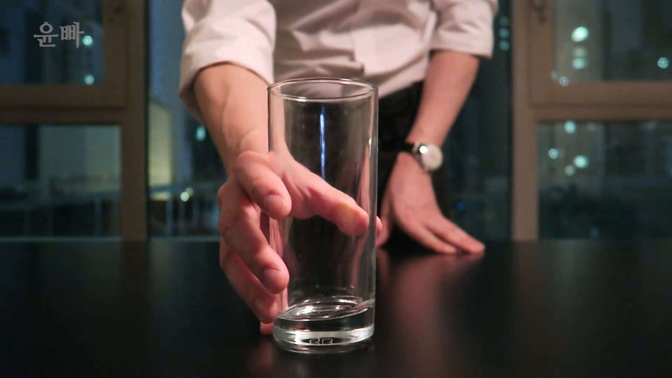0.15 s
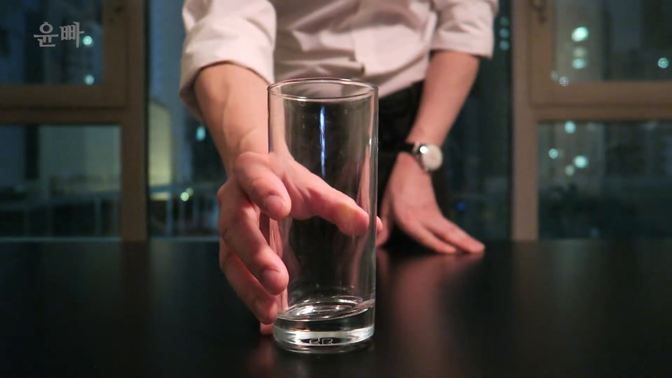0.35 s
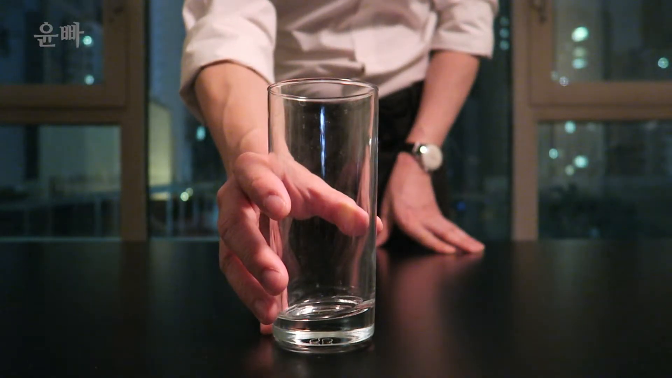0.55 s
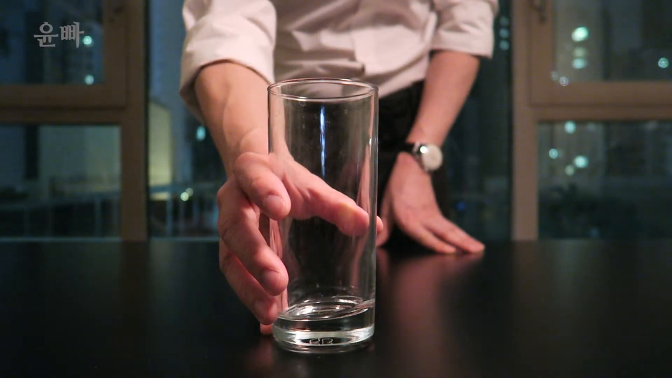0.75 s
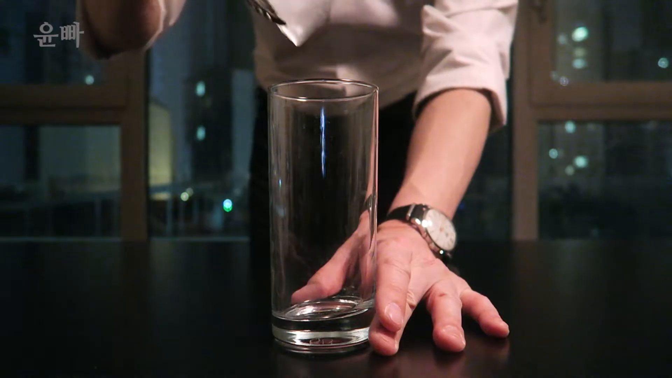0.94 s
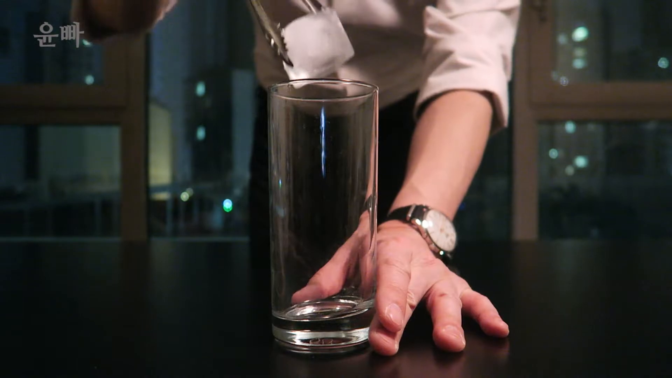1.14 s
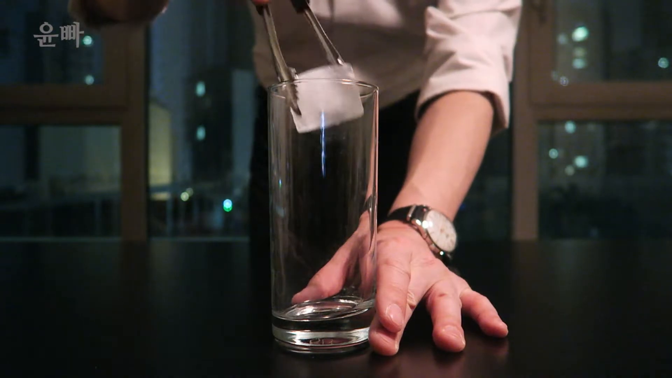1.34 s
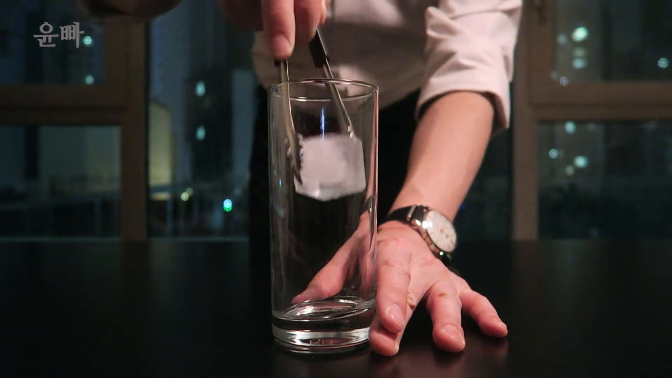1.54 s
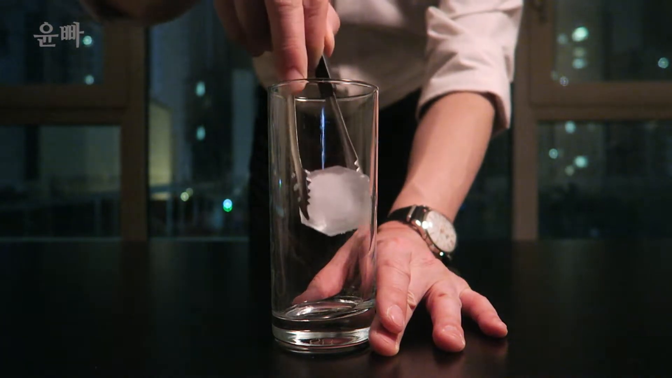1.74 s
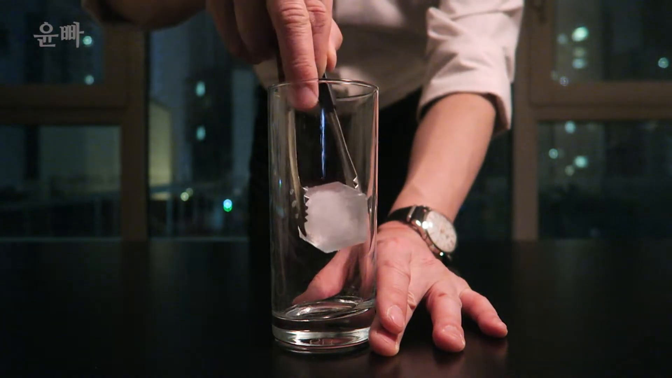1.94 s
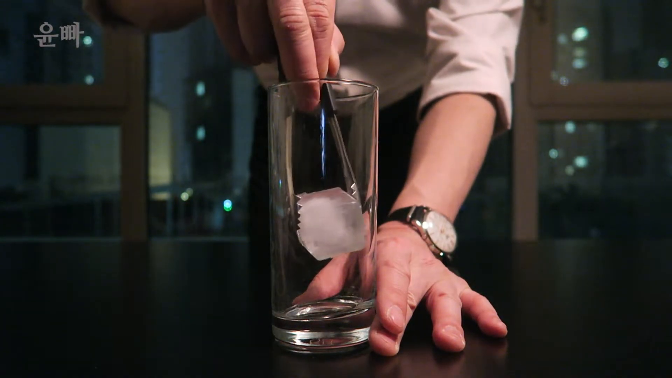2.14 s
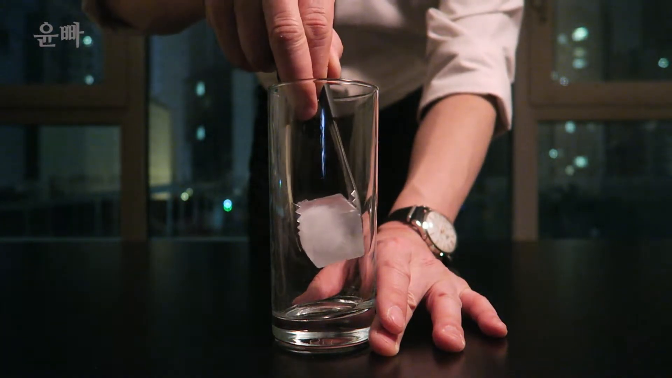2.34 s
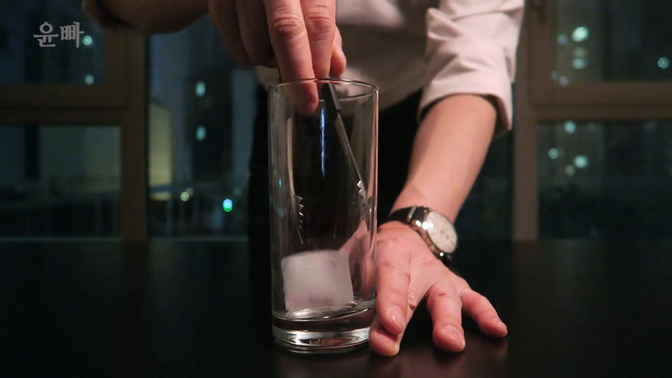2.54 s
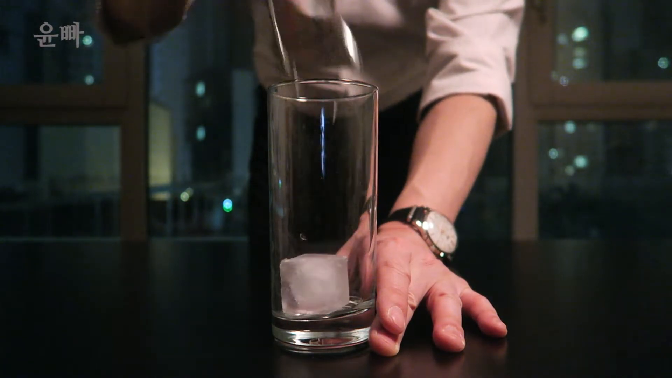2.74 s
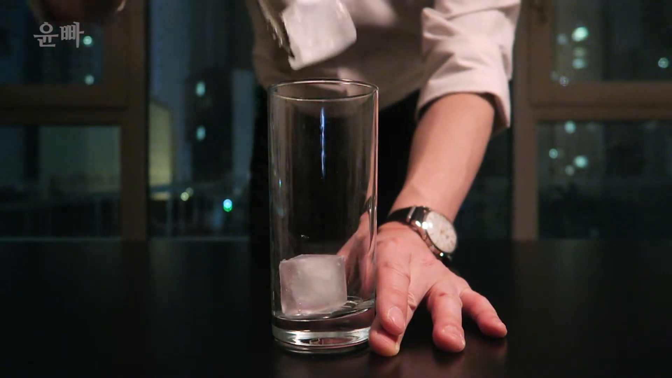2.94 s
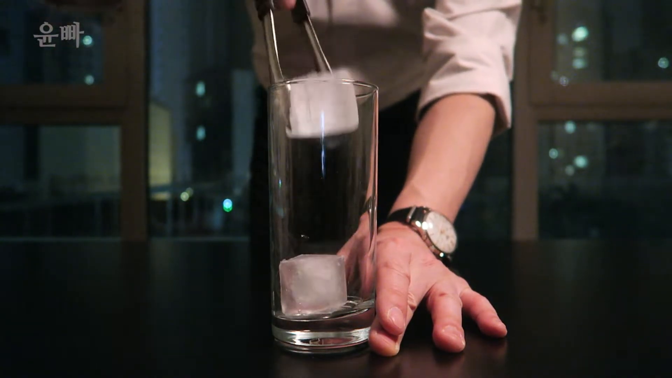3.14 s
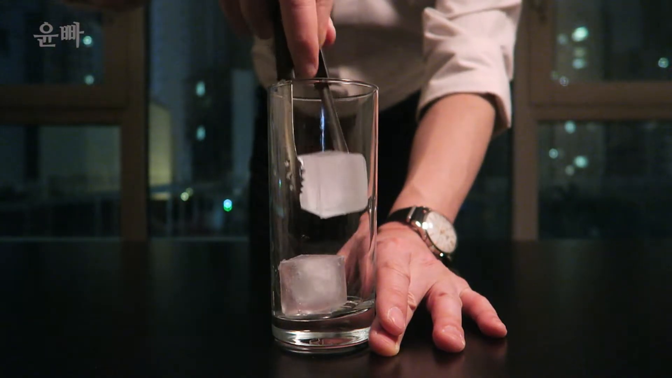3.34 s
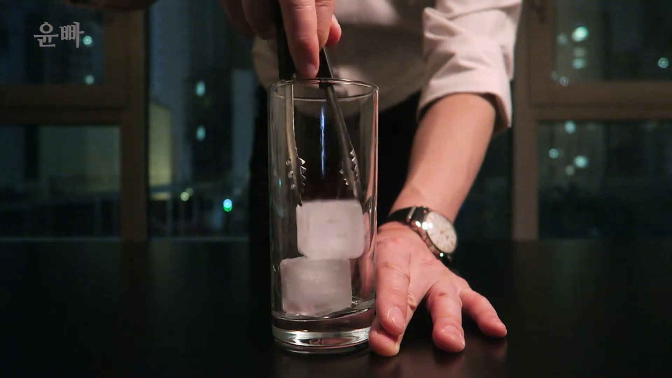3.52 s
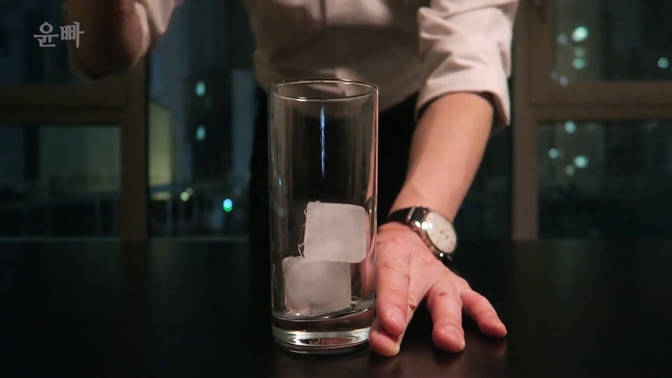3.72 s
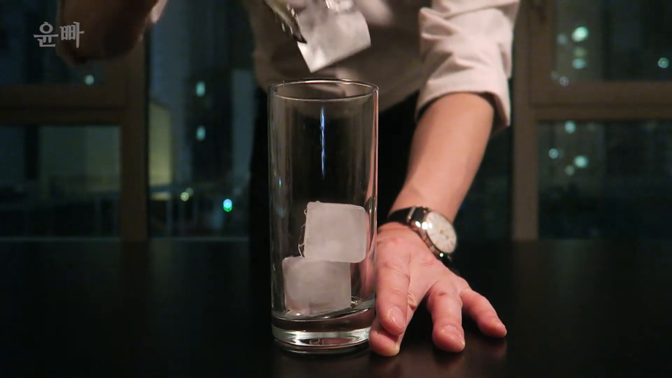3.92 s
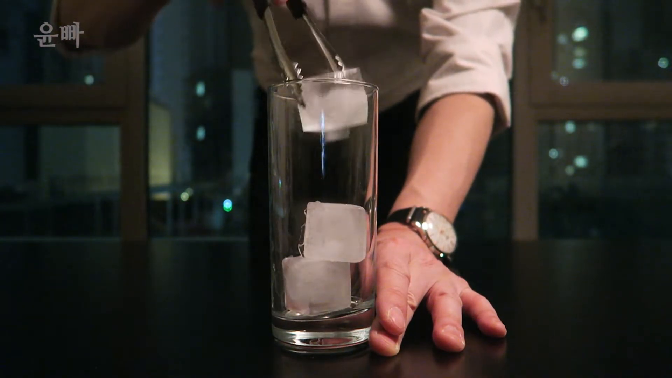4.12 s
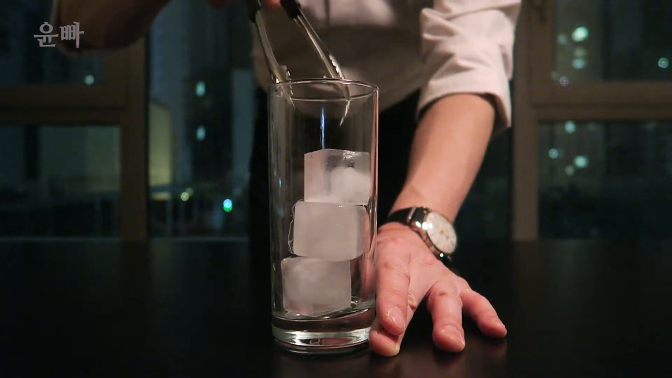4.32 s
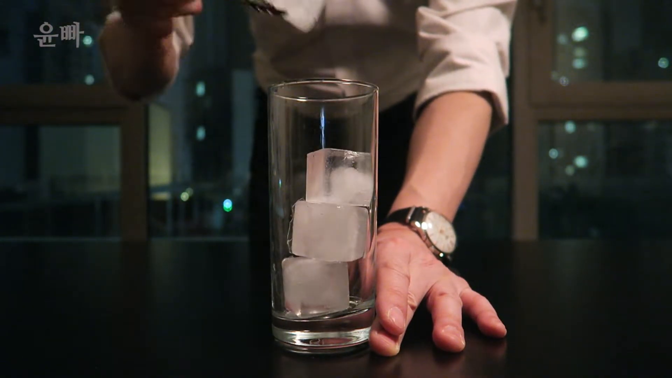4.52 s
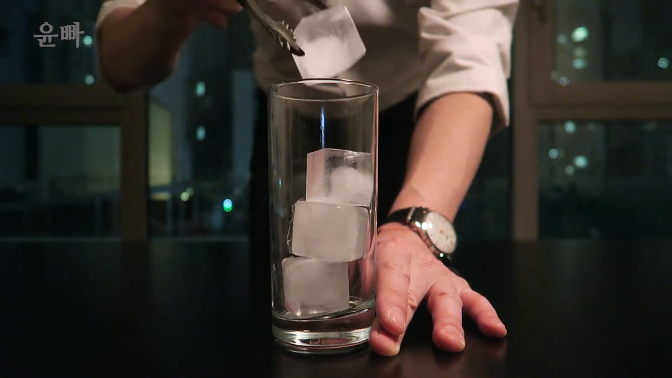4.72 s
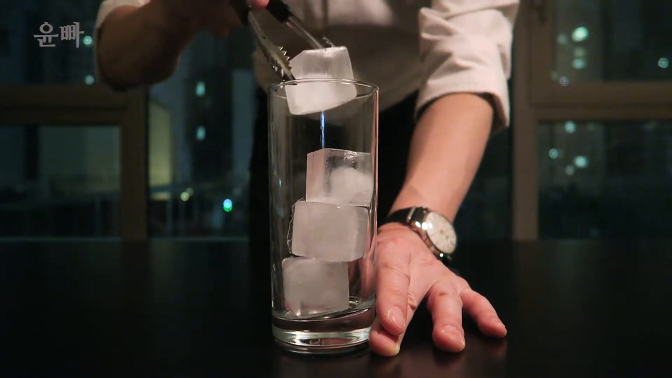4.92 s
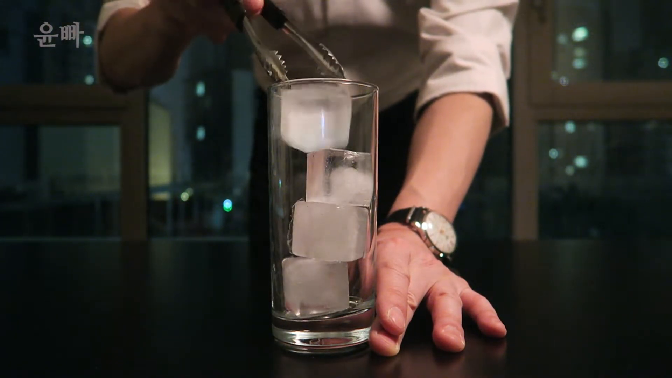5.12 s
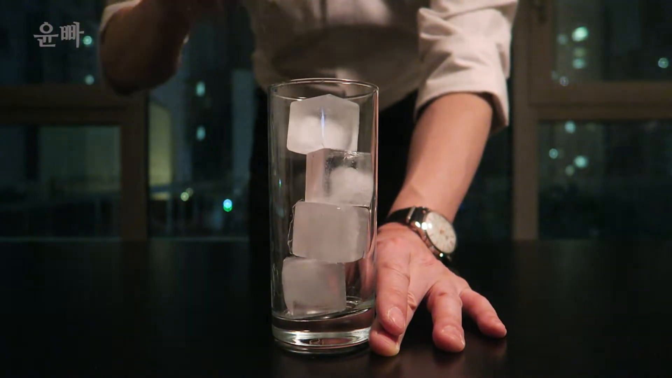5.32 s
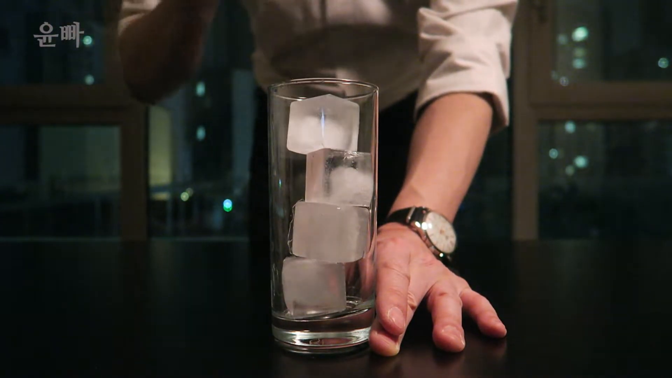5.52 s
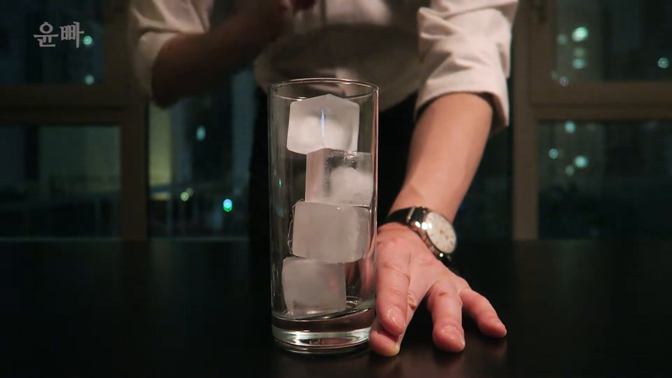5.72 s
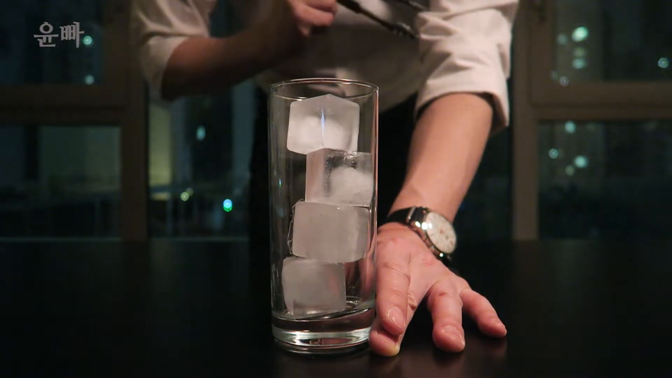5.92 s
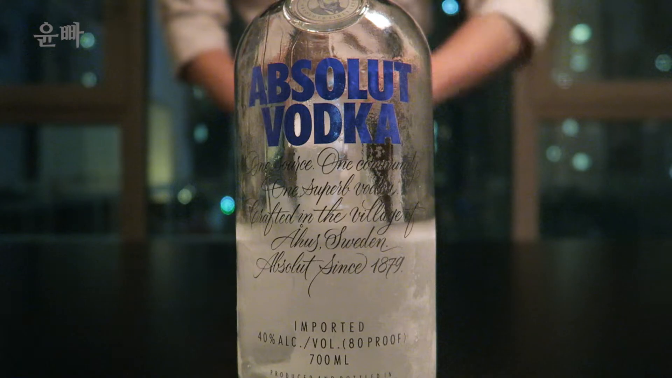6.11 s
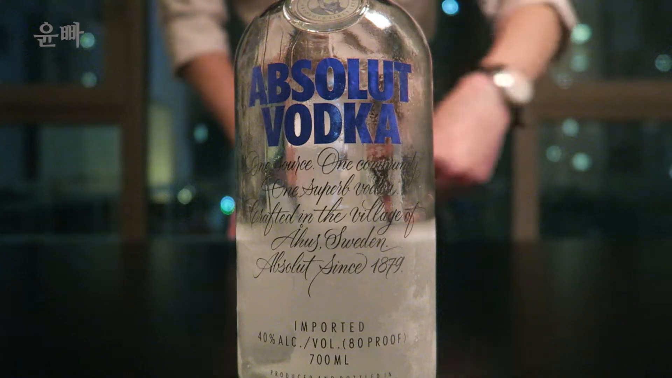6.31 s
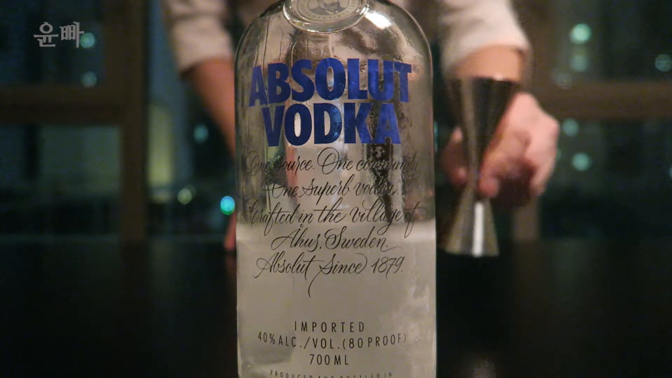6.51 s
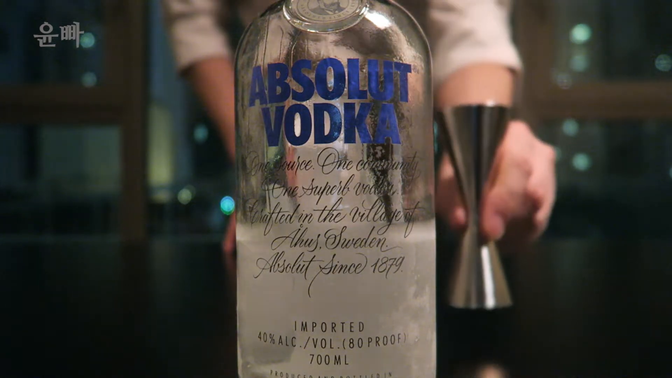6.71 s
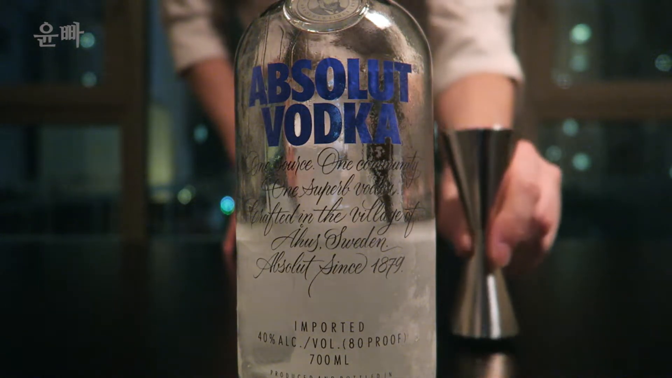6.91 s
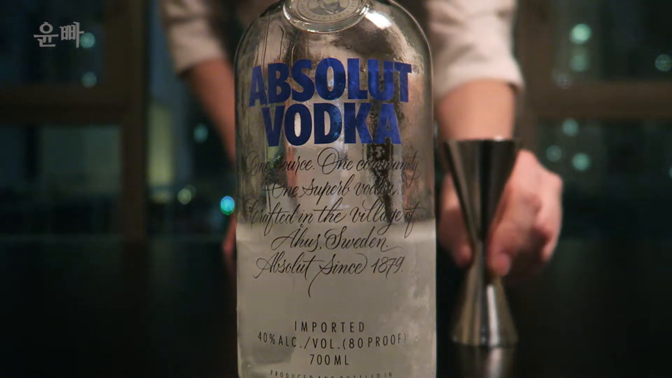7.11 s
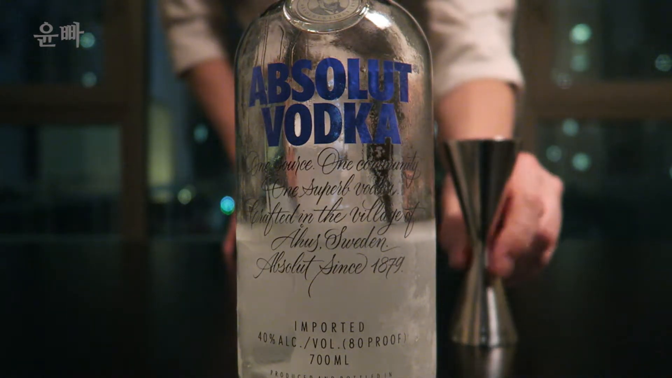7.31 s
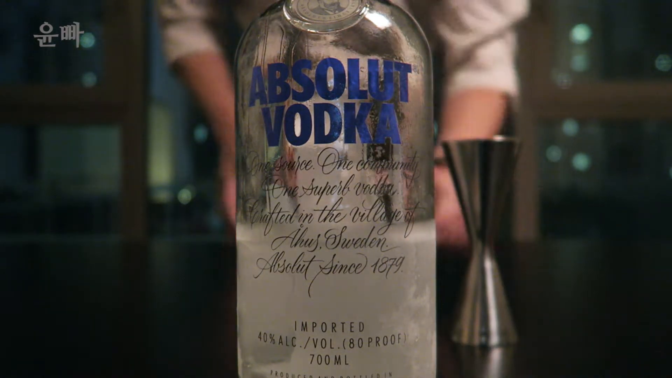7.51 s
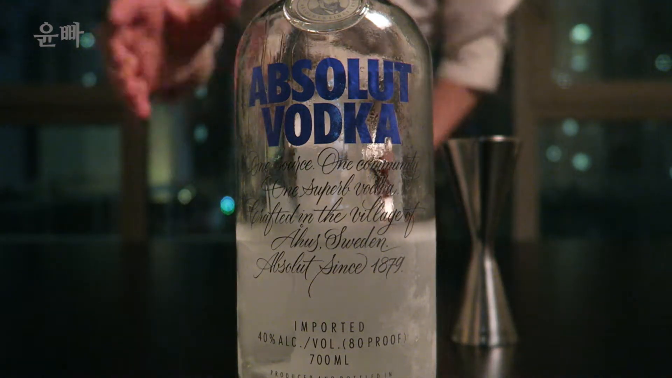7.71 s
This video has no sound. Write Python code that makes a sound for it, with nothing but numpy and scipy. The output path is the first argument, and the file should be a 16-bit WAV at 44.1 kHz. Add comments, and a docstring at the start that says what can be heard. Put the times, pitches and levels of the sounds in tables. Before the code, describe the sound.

Low machine hum and dull room air throughout, with faint cloth brushing. Ice is placed with tongs into a tall glass: first a small touch and rattling landing, then three more separated clinks, the second and third hard and crisp, the last softer and doubled. Rings are mostly damped quickly by the ice. Finally a metal jigger strikes the tabletop, short and solid, with a little room reverberation. Close miked.

```python
"""Room air, steady hums and sleeve swells (shaped noise and sines) run throughout; a faint gliding tone comes early.
Four ice cubes are then let down with tongs into a tall glass: each touch of the wall excites its decaying modes,
the tongs ping, and each landing rings the base and the air inside, cracks and shakes the table.
Last, a steel jigger is set on the table and rocks: its own modes and the air in its cup ring.
The sound runs in successive stretches, and the end of each one stops whatever still rings."""
import sys
import numpy as np
from scipy import signal
from scipy.fft import rfft, irfft
from scipy.io import wavfile

SR = 44100
rng = np.random.default_rng(int(sys.argv[2]) if len(sys.argv) > 2 else 0)


def int16_out(signal):
    """Quantize to a 16-bit WAV file."""
    q = np.round(np.clip(np.atleast_2d(signal).T, -1, 1) * 32767)
    wavfile.write(sys.argv[1], SR, q.astype(np.int16))


N = 342075

# Boundaries of the stretches. Each entry: time in seconds.
BOUNDARIES = [0, .82, 2.837, 3.771, 4.489, 6.05, N / SR]


def amp(db):
    """Level to amplitude: 20 dB is a factor of ten."""
    return 10 ** (np.asarray(db) / 20)


def unit(x):
    """Normalization of power: scales a signal to rms 1."""
    return x / np.sqrt(np.mean(x ** 2) + 1e-20)


def read(points, hz):
    """Linear interpolation of a table on a logarithmic frequency axis."""
    point_hz, value = np.transpose(points)
    return np.interp(np.log(hz + 1), np.log(point_hz + 1), value)


def colour(x, points):
    """Spectral shaping: weights each frequency by a table of Hz and dB."""
    gain = amp(read(points, np.fft.rfftfreq(len(x), 1 / SR)))
    return irfft(rfft(x) * gain, len(x))


def add(mix, s, sound):
    """Superposition: adds a sound to the mix from s seconds on."""
    part = mix[round(s * SR):][:len(sound)]
    part += sound[:len(part)]


def spread(mid, side):
    """Diffuse-field coherence: two close microphones hear the bass alike, the treble less so."""
    # Each row: frequency in Hz, level of side against mid in dB.
    width = [(60, -28), (160, -7.5), (350, 0.5), (700, -5), (1500, 0.5), (3000, -1.5), (6000, 0),
             (14000, 0.5)]
    side = colour(side, width)
    return np.array([mid + side, mid - side])


def noise(points):
    """Diffuse noise: independent mid and side of the given spectrum, each rms 1 before spreading."""
    mid, side = (unit(colour(white, points)) for white in rng.standard_normal((2, N)))
    return spread(mid, side)


def drone(t):
    """Frequency modulation: a faint tone fades in, holds and fades out while its pitch rises and sinks."""
    start_s, length_s, fade_s = 1.13, 1.277, 0.29
    level_db, base_hz, arch_hz = -46.5, 209, 14
    age = np.clip(t - start_s, 0, length_s)
    hz = base_hz + arch_hz * np.sin(np.pi * age / length_s)
    phase = 2 * np.pi * np.cumsum(hz) / SR
    fade = np.minimum(np.minimum(age, length_s - age) / fade_s, 1)
    return amp(level_db) * fade * np.sqrt(2) * np.sin(phase)


def sleeves(t):
    """Friction noise: each move of an arm is one bell-shaped swell of brushing cloth."""
    # Moves of an arm. Each row: loudest moment in seconds, time to swell or fade in seconds, level in dB rms.
    arm_moves = [(1.03, 0.22, -64.5), (1.52, 0.2, -64), (3.45, .08, -62.5), (4.21, 0.055, -64.5),
                 (5.14, 0.052, -65), (5.8, 0.17, -62.5), (6.5, 0.26, -61), (7.68, 0.21, -57)]
    # Spectrum of rubbed cloth. Each row: frequency in Hz, relative level in dB per Hz.
    cloth = [(200, -20.5), (900, -2.5), (3000, 2), (5500, -7.5), (10000, -19.5), (16000, -23.5)]
    rest_db = -74  # cloth stirs faintly between the moves
    moves = sum(amp(db) * np.exp(-((t - s) / swell_s) ** 2) for s, swell_s, db in arm_moves)
    return np.hypot(moves, amp(rest_db)) * noise(cloth)


def background():
    """Superposition of room air, brushing sleeves and the faint gliding tone."""
    # Spectrum of the room air. Each row: frequency in Hz, relative level in dB per Hz.
    air_spectrum = [(59, -45), (100, -11), (129, -7), (214, -4), (249, -5.5), (372, -10.5), (404, -5.5),
                    (813, -19), (1190, -19.5), (1270, -21), (14200, -45), (15800, -56.5)]
    air_db = -52
    t = np.arange(N) / SR
    return sleeves(t) + amp(air_db) * noise(air_spectrum) + drone(t)


def hum(start, end):
    """Steady sinusoids: the machinery tones whose span holds the middle of this stretch."""
    # Each row: start of the span in seconds, end in seconds, frequency in Hz, level in dB rms.
    machinery = [(0, 6.05, 69.5, -41), (0, .82, 120, -52), (6, 7.76, 78.6, -41), (2, 6.05, 280, -63),
                 (3.5, 7.76, 140, -61)]
    t = np.arange(round(start * SR), round(end * SR)) / SR
    phases = rng.uniform(0, 2 * np.pi, len(machinery))
    return sum(np.sqrt(2) * amp(db) * np.sin(2 * np.pi * hz * t + phase)
               for (on, off, hz, db), phase in zip(machinery, phases) if on < t.mean() < off)


def room_tail(build_s=0.0086):
    """Reverberation: dense reflections build up, then decay exponentially band by band."""
    # Each row: frequency in Hz, reverberation time t60 in seconds.
    decay_times = [(150, 0.4), (400, 0.1743), (1000, 0.4232), (2200, 0.3734), (4000, 0.3743), (7500, 0.33),
                   (14000, 0.2)]
    # Each row: frequency in Hz, level of the tail in dB.
    tail_levels = [(100, -20.5), (200, -2), (500, 0), (1000, -10.5), (2100, -6.5), (4000, -6.5),
                   (8000, -3.5), (14000, -8)]
    # sparse impulses of random sign, on average one in ten samples
    impulses = rng.choice([-1., 1.], SR) * (rng.random(SR) < 1 / 10)
    hz, t, bands = signal.stft(impulses, SR, nperseg=256)
    t60 = read(decay_times, hz)[:, None]
    decay = amp(read(tail_levels, hz)[:, None] - 60 * t / t60)
    # the same energy whatever the decay time
    energy_scale = np.sqrt(10 * np.log(10 ** 6) / (t60 * SR))
    tail = signal.istft(bands * decay * energy_scale, SR, nperseg=256)[1][:SR]
    return tail * np.minimum(np.arange(SR) / SR / build_s, 1) ** 2


def room(x, wet_db, side_db=-5):
    """Convolution with a room response: direct sound, near surfaces, then the tail, at two microphones."""
    # Near surfaces. Each row: delay in seconds, level in dB, extra delay at the right microphone in seconds.
    echoes = [(.0022, -13, .00005), (.0047, -19.5, -.00005), (.0093, -18.5, .00007), (0.0133, -14, -.00007)]
    # Each row: frequency in Hz, phase by which the left microphone leads in radians.
    phase_lead = [(0, -0.026), (1200, -0.04), (2070, -0.28), (3960, 0.046), (5600, -0.1), (6980, 0.28),
                  (7320, 0.1), (11900, 0.1), (15500, 0.0)]
    left, right = spread(room_tail(), amp(side_db) * room_tail())
    for delay_s, db, lag_s in echoes:
        left[round(delay_s * SR)] += amp(db)
        right[round((delay_s + lag_s) * SR)] += amp(db)
    lead = read(phase_lead, np.fft.rfftfreq(len(x), 1 / SR))
    # half the lead goes to each side
    turn = np.exp(.5j * np.outer([1, -1], lead))
    direct = irfft(rfft(x) * turn, len(x))
    reflected = signal.fftconvolve(x[None], np.array([left, right]), axes=1)[:, :len(x)]
    return direct + amp(wet_db) * reflected


def knock(body, level_db, treble_hz, bass_hz, air_hz, crack_db, table_db,
          air_db=1, air_t60=.04, crack_t60=0.037, table_t60=0.15):
    """Impact excitation: a blow rings a body and the air in it, cracks, and shakes the table top."""
    # Burst of a contact. Each row: frequency in Hz, relative level in dB per Hz.
    crack_spectrum = [(150, -19.5), (500, -8), (1500, -7), (2500, 0.5), (3400, 0.5), (4500, -7.5),
                      (9000, -16.5), (16000, -27)]
    # Crowded modes of the table top. Each row: frequency in Hz, relative level in dB per Hz.
    table_spectrum = [(100, -27), (175, -3), (240, -12.5), (400, -4), (800, -0.5), (1050, -8),
                      (1600, -11.5), (3000, -19.5), (8000, -38)]
    t = np.arange(SR // 2) / SR
    air = amp(air_db - 60 * t / air_t60) * np.sin(2 * np.pi * air_hz * t)
    # neighbouring modes start in opposite directions
    modes = sum((-1) ** k * amp(db - 60 * t / t60) * np.sin(2 * np.pi * hz * t)
                for k, (hz, db, t60) in enumerate(body))
    crack = unit(colour(rng.standard_normal(len(t)), crack_spectrum))
    crack = crack * amp(crack_db - 60 * t / crack_t60)
    table = unit(colour(rng.standard_normal(len(t)), table_spectrum))
    table = table * amp(table_db - 60 * t / table_t60)
    # a soft contact rounds off the treble, a light one makes little bass
    rounded = signal.butter(2, min(treble_hz, SR / 3), fs=SR)
    blow = signal.lfilter(*rounded, air + modes + crack + table)
    return amp(level_db) * signal.lfilter(*signal.butter(1, bass_hz, "high", fs=SR), blow)


def jigger_knock(s, level_db, treble_hz, crack_db, table_db):
    """Modal ringing of a struck shell: the steel jigger strikes the table and the air in its cup resonates."""
    # The jigger standing on the table. Each row: frequency in Hz, level in dB, t60 in seconds.
    jigger_modes = [(211, -11.5, 0.087), (293, -27, 0.32), (552, -10.5, 0.075), (678, -7, 0.04),
                    (747, -8, 0.11), (980, -3, 0.067), (1274, -8, 0.032), (1780, -17, 0.027),
                    (2014, -40, 0.81), (2025, -8, 0.04), (2227, -17, .06), (2820, -33.5, .04),
                    (3092, -15, 0.1), (3460, -18, 0.054)]
    bass_corner_hz, cup_air_hz = 763, 1530
    return knock(jigger_modes, level_db, treble_hz, bass_corner_hz, cup_air_hz, crack_db, table_db,
                 air_db=2.0, air_t60=0.018)


def ping(s, level_db):
    """Lightly damped bar modes: the thin, high ring of the steel tongs."""
    # The arms of the tongs. Each row: frequency in Hz, level in dB, t60 in seconds.
    arm_modes = [(10770, -1.5, 0.11), (10845, -3, .12), (14590, -8, .1)]
    t = np.arange(SR // 4) / SR
    return sum(amp(level_db + db - 60 * t / t60) * np.sin(2 * np.pi * hz * t) for hz, db, t60 in arm_modes)


def clink(level_db, bright_db, depth, free_s):
    """Modal excitation of the wall: a touch on a node misses its mode, and leaning ice damps the ring."""
    # The glass wall. Each row: frequency in Hz, level in dB, t60 in seconds, half waves from rim to base.
    wall_modes = [(2078.6, 3.5, .75, 0), (3950, -4.5, 0.58, 0.77), (6730, -9.5, .12, 3.5),
                  (6910, -15, 0.2, 3), (7720, -11, 0.19, 2.4), (12000, -20, .14, 3.5),
                  (12650, -25, .14, 3.5), (13560, -20.5, .11, 3.5), (14590, -23.5, .1, 4),
                  (15200, -28, .1, 4)]
    bright_top_hz = 8000  # the tilt of brightness stops here
    node_db = -24.5  # what a mode still gets when touched on a node
    twin_db, twin_split_hz = -23, 4.1  # the lowest mode's twin has a node under the ice and rings on
    lowest_leaning_t60, upper_leaning_t60 = 0.0071, 0.65  # extra damping under leaning ice (s)
    contact_s = 0.0002  # length of a touch
    tick_db, tick_t60, tick_hz = -7.5, 0.032, 1500  # level before the filter, decay (s), treble corner
    t = np.arange(SR) / SR
    hz, db, t60, half_waves = np.transpose(wall_modes)[:, :, None]
    swing = np.hypot(np.cos(np.pi * half_waves * np.clip(depth, 0, 1)), amp(node_db))
    tilt_db = bright_db * np.log2(np.minimum(hz, bright_top_hz) / hz[0])
    rings = swing * amp(level_db + db + tilt_db - 60 * t / t60)
    modes = rings * np.sin(2 * np.pi * hz * t)
    # the lowest mode swings widest, so leaning ice stops it within milliseconds
    leaning_s = np.maximum(t - free_s, 0)
    lowest = modes[0] * amp(-60 * leaning_s / lowest_leaning_t60)
    twin = rings[0] * amp(twin_db) * np.sin(2 * np.pi * (hz[0] + twin_split_hz) * t)
    upper = modes[1:].sum(0) * amp(-60 * leaning_s / upper_leaning_t60)
    tick = rng.standard_normal(len(t)) * amp(level_db + tick_db - 60 * t / tick_t60)
    tick = signal.lfilter(*signal.butter(1, tick_hz, fs=SR), tick)
    onset = 1 - np.exp(-(t / contact_s) ** 2)
    return (lowest + twin + upper) * onset + tick


def cube_knock(s, level_db, treble_hz, crack_db, table_db):
    """Impact on a plate: the harder the contact and the less it shakes the table, the less bass."""
    # The glass base and the ice on it. Each row: frequency in Hz, level in dB, t60 in seconds.
    base_modes = [(175, -10, 0.076), (272, -18.5, 0.12), (353, -18, 0.18), (420, -10, 0.068),
                  (530, -16.5, 0.068), (691.7, -15, 0.046), (810, -28, 0.55), (995, -15, .04),
                  (1216, -7.5, .025), (1690, -7.5, 0.026), (1985, -8, 0.032), (2450, -18.5, 0.035),
                  (2960, -14, .03), (3345, -8.5, 0.038), (3561, -10.5, .03), (4960, -17.5, 0.02)]
    # The air in the glass rises in pitch as the ice piles up, then sinks as the last cube narrows the mouth.
    # Each row: time in seconds, resonance in Hz.
    air_column = [(3.2, 730), (3.5, 833), (4.3, 827), (5.2, 758)]
    # bass corner of a soft knock that shakes the table at 0 dB, and the drop in dB that raises it an octave
    bass_corner_hz, bass_octave_db = 45, 13
    # treble corner of a soft knock, and the octaves the bass corner rises for each octave above it
    soft_hz, bass_follows = 2040, 1
    hardness = (treble_hz / soft_hz) ** bass_follows
    lightness = 2 ** (-(level_db + table_db) / bass_octave_db)
    bass_hz = min(bass_corner_hz * hardness * lightness, SR / 4)
    air_hz = np.interp(s, *np.transpose(air_column))
    return knock(base_modes, level_db, treble_hz, bass_hz, air_hz, crack_db, table_db)


def play(rows, voice, start, end):
    """Superposition in time: sounds the rows of a table that fall within one stretch."""
    dry = np.zeros(round(end * SR) - round(start * SR))
    for s, *columns in rows:
        if start <= s < end:
            add(dry, s - start, voice(s, *columns))
    return dry


def stretch(start, end):
    """Direct and reverberant sound: all blows of one stretch, in the room, over the hum."""
    # The jigger meets the table and rocks. Each row: start in seconds, level in dB, treble corner in Hz,
    # level of the crack in dB, level of the table top in dB.
    set_down = [(7.0253, 2, 2205, -7, -12.5), (7.368, -43.5, 1193, -11, 1)]
    # The tongs knock the glass or spring free. Each row: start in seconds, level in dB.
    pings = [(3.1686, -31.5), (3.5078, -45.5), (4.3652, -38.5), (5.2835, -51)]
    # Ice or tongs touch the wall. Each row: start in seconds, level in dB, brightness in dB per octave,
    # depth from 0 at the rim to 1 at the base, time until ice leans on the wall in seconds.
    clinks = [(1.7387, -16.5, -4.5, 0.67, 0.0068), (2.4882, -21.5, -2.5, 0.65, 0.1),
              (2.5412, -15, -0.5, 0.65, 0.037), (2.5668, -19, -3.5, 0.74, 0.076),
              (2.6418, -20, -8, 0.62, .3), (3.1686, -24, 5.5, 0.63, .072), (3.225, -38, 1, 0.33, .02),
              (3.5078, -9, -1, 0.65, .145), (3.653, -14, -7, 0.48, .3), (4.2595, -16.5, 1, 0.098, 0.22),
              (4.3652, -23, -1.5, 0.65, 0.063), (5.16, -23, -5, 0.36, 0.013), (5.1848, -23, 0, 0.16, 0.021),
              (5.2266, -16, -2.8, 0.097, 0.038), (5.2835, -40, 1.5, .88, .076),
              (5.362, -33, -3, 0.71, 0.024)]
    # Cubes land, bounce and settle. Each row: start in seconds, level in dB, treble corner in Hz,
    # level of the crack in dB, level of the table top in dB.
    landings = [(1.7472, -24, 1627, -5, -7), (2.5666, -2.5, 2250, -13, -3.5), (2.5792, -13, 4500, 1, -4.5),
                (2.6413, -7.5, 3170, -8.5, -4.5), (2.706, -26, 4000, -15, 0),
                (3.1688, -27.5, 1200, -10.5, -8.5), (3.1861, -14.5, 1000, -0.5, -12.5),
                (3.498, 1, 6000, -7, -23.5), (3.589, -17, 1500, -13, -7), (3.624, -18, 1800, -25.5, -6),
                (3.6528, -39.5, 6900, 11.5, -10.5), (4.2535, -36.5, 7000, 0.5, -11),
                (4.2594, 4, 7986, -2, -10), (4.277, -23.5, 7100, 2.5, -12.5), (4.3235, -11, 3500, 0.5, -3),
                (5.1843, -5, 1900, -11, -6), (5.2075, -9.5, 2010, 0.5, -12.5),
                (5.2675, -26.5, 3200, 4, 2.5), (5.325, -24, 1200, 4, -10.5), (5.8125, -40, 4500, 2, -3.5)]
    jigger = play(set_down, jigger_knock, start, end)
    tongs = play(pings, ping, start, end)
    chimes = play(clinks, lambda s, *touch: clink(*touch), start, end) + tongs
    ice = play(landings, cube_knock, start, end)
    soft_edges = signal.windows.tukey(len(ice), .002 / (end - start))  # 1 ms fade at each end
    # the wall chimes right at the microphones; the wide table top feeds the room more
    blows = room(chimes, wet_db=-5.0) + room(ice + jigger, wet_db=1.0)
    return (blows + hum(start, end)) * soft_edges


def scene():
    """Superposition: the stretches in a row, over the continuous background."""
    stretches = [stretch(start, end) for start, end in zip(BOUNDARIES, BOUNDARIES[1:])]
    return np.hstack(stretches) + background()


def smooth(v, seconds):
    """Exponential relaxation: a one-pole lag."""
    r = np.exp(-1 / (seconds * SR))
    return signal.lfilter([1 - r], [1, -r], v)


def gain_control(x, threshold_db=-15, share=0.62, recover_db_per_s=14, sense_s=.006, attack_s=0.0025):
    """Dynamic range compression: turns down quickly after a loud blow and recovers slowly."""
    power_db = 10 * np.log10(smooth((x ** 2).mean(0), sense_s) + 1e-12)
    over_db = share * np.maximum(power_db - threshold_db, 0)
    fall = recover_db_per_s * np.arange(len(over_db)) / SR
    # the reduction holds its peaks, which sink at the recovery rate
    reduction_db = np.maximum.accumulate(over_db + fall) - fall
    return x * amp(-smooth(reduction_db, attack_s))


def record(dry, knee=7):
    """Compression within each stretch, soft saturation of the hardest blows, then a low-pass band limit."""
    edge_hz = 15900
    parts = np.split(dry, [round(s * SR) for s in BOUNDARIES[1:-1]], axis=1)
    levelled = np.hstack([gain_control(x) for x in parts])
    clipped = levelled / (1 + abs(levelled) ** knee) ** (1 / knee)
    low_pass = signal.firwin(255, edge_hz, window=("kaiser", 8), fs=SR)
    return signal.oaconvolve(clipped, low_pass[None], "same")


dry = scene()
out = record(dry)
int16_out(out)
```